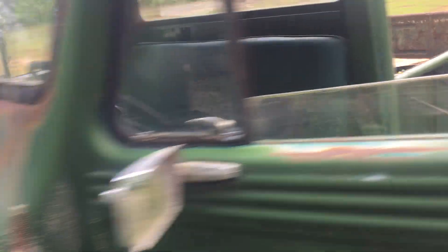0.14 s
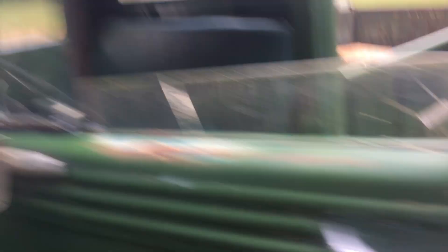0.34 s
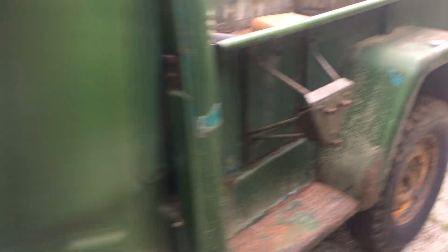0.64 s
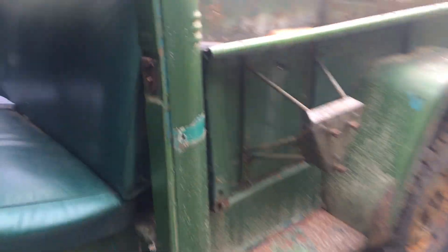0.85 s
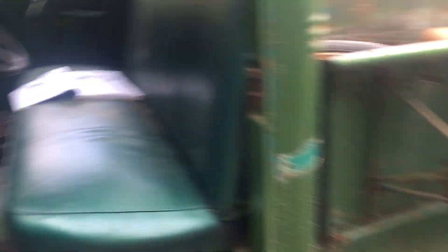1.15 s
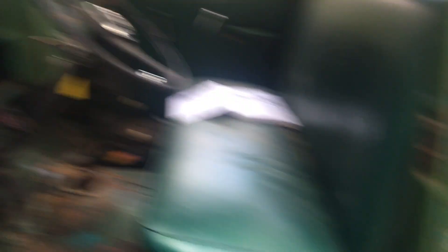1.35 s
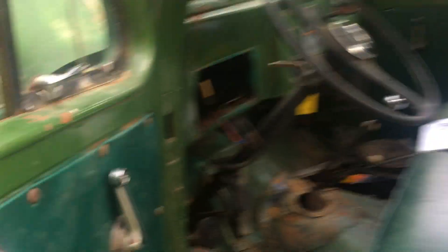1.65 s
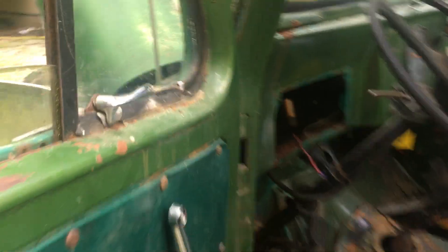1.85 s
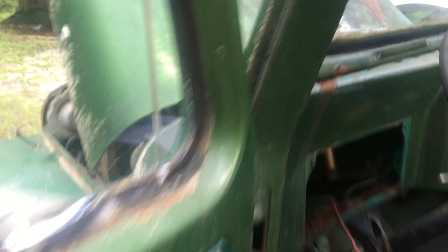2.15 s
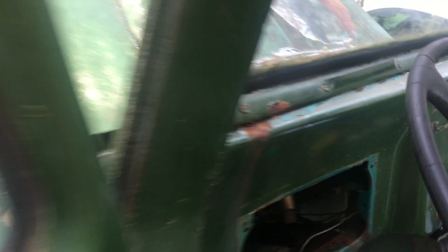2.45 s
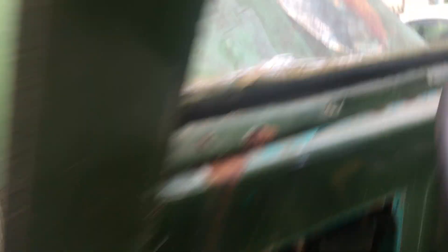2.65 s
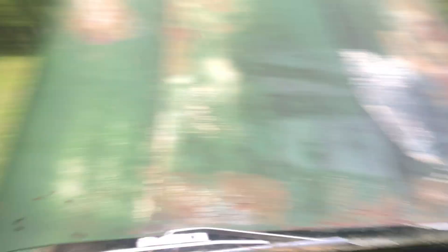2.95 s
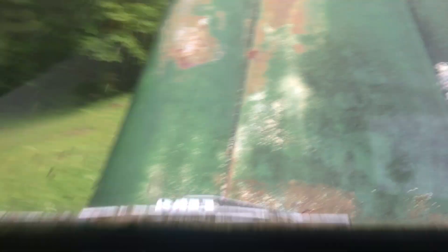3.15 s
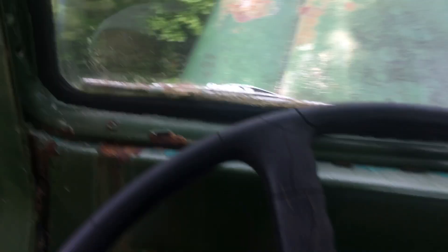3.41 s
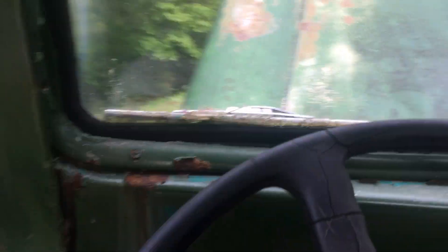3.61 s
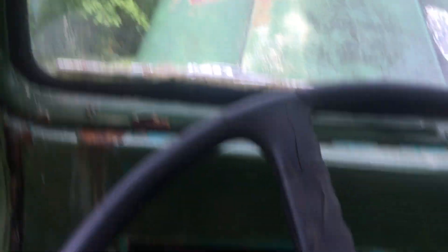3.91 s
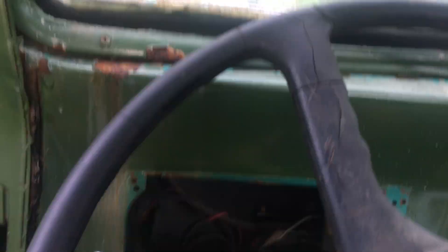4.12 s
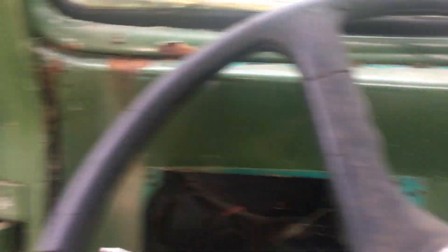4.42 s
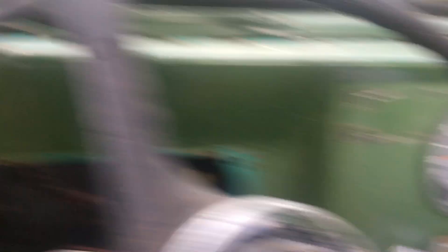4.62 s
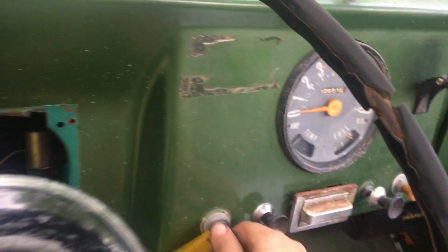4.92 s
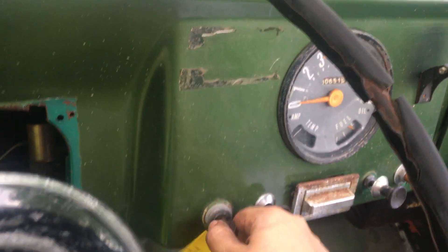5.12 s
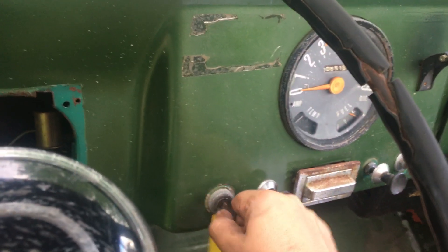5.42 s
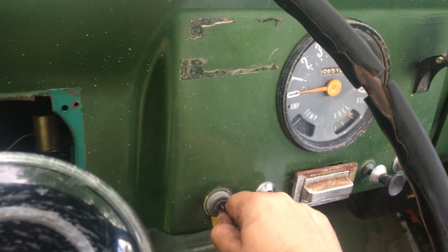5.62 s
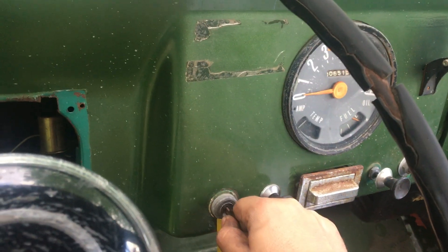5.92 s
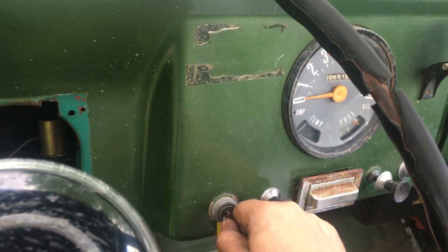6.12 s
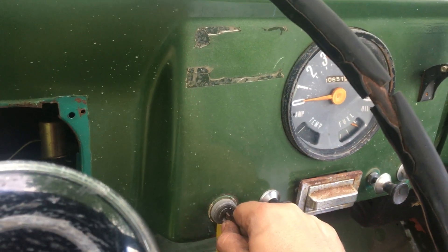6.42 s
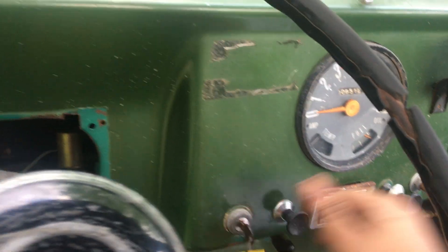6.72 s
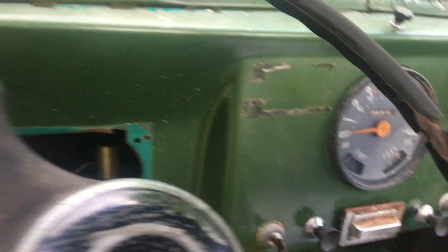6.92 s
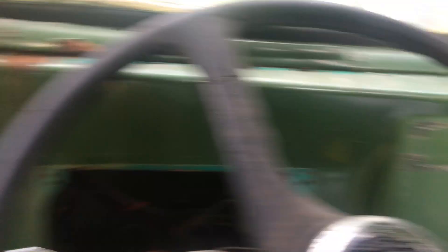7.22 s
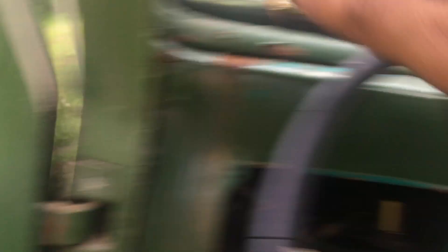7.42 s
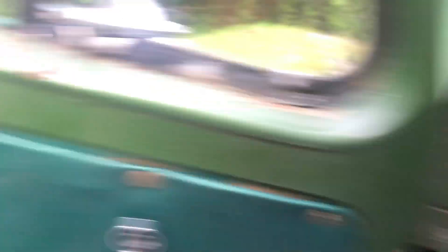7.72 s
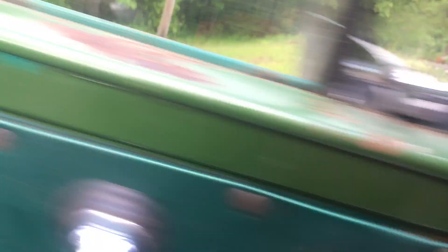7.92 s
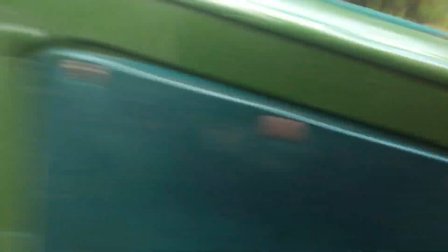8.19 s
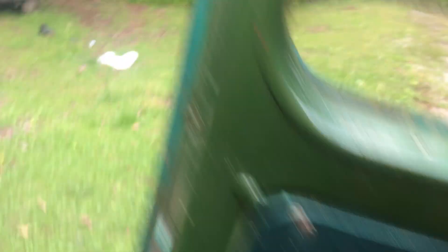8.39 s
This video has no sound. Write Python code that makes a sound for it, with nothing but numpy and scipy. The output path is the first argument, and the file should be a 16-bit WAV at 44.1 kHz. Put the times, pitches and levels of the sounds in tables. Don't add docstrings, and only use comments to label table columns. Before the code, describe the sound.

A rough old petrol engine idles with a deep uneven boom, knocks and hisses, then is switched off and shudders down into rustles and thuds.

```python
import sys
import numpy as np
from scipy import signal
from scipy.io import wavfile
from scipy.ndimage import uniform_filter1d

SR = 44100
rng = np.random.default_rng(int(sys.argv[2]) if len(sys.argv) > 2 else 0)


def file_out(sig):
    cols = np.atleast_2d(sig).T
    lim = np.clip(cols, -1, 1)
    pcm = np.round(lim * 32767).astype(np.int16)
    wavfile.write(sys.argv[1], SR, pcm)


def natural_amplitude(level_db):
    exponent = np.asarray(level_db, float) / 20
    return 10 ** exponent


N = 377055
TIME = np.arange(N) / SR
STEP = np.arange(0, N / SR + .002, .002)
FRAME_START = np.arange(N // 256 + 5) * 256

# time in seconds, firings per second.
IDLE = [(0.0, 68.5), (0.75, 68.2), (1.25, 66.9), (1.5, 67.0), (2.0, 68.3), (2.35, 67.3), (2.8, 67.3),
        (3.25, 68.4), (4.0, 68.1), (4.5, 67.15), (5.5, 66.4)]
KEY_OFF_S, COAST_S, FRICTION_FIRINGS_PER_S = 5.635, 1.1, 12.5
START_TURN_FIRINGS = -.7
SPARK_FADE_S, CRAWL_FIRINGS_PER_S = 0.13, 12.1
# exhaust pulse in dB, lateness in firings, knock in dB, hiss in dB.
CYLINDERS = [(1.5, -.05, -8, -.8), (1, -.05, -9, 1.7), (-2.5, .14, -5, -.8), (-3, .1, 0, .7),
             (2.8, -.08, -1, .6), (-1.5, -.03, -9, -.9)]
MISFIRE_S = [1.279, 1.759, 2.469, 3.089, 3.589, 4.514]
# frequency in Hz, width in Hz, level in dB.
BOOM_MODES = [(64, 44, 0), (113, 18, -15)]
# frequency in Hz, density in dB per Hz.
RUMBLE_COLOUR = [(20, -30), (40, -6), (55, 18), (75, 21), (90, -0.5), (110, -6), (130, -11.5), (200, -15),
                 (400, -55)]
# frequency in Hz, width in Hz, dB at the door, dB in the cab,
# dB gained without spark.
BLOCK_MODES = [(119.3, 21, 3, -0.5, -10), (152, 29, -6, -24, 3), (168, 14.7, -5.5, -7, 3),
               (179, 33, -11, -17.5, 4.5), (212.6, 31, -2.5, -6, -0.5), (227.8, 8.5, -2.5, -4.5, 3),
               (263.7, 25.6, -4.5, -6.5, -4.5), (357, 24, -13, -21.5, 0), (586, 56, -14, -12.5, -2)]
# frequency in Hz, density in dB per Hz.
ROAR_COLOURS = [
    [(180, -25), (300, 5.5), (359, -6), (396, -6), (450, 1.5), (492, -1.5), (571, -6.5), (669, -2.5), (761, -10.5), (965, -3.5), (1510, -7.5), (1870, -4), (2450, -8), (2790, -13), (3200, -50), (4160, -63), (7040, -120)],
    [(180, -61), (300, -10.5), (338, 2), (464, -4.5), (522, -6.5), (571, -3.5), (612, -1.5), (710, -2.5), (792, -7.5), (1130, -4), (1550, -5.5), (1710, -2.5), (2450, -14.5), (2650, -24), (3200, -20.5), (4160, -45), (7040, -120)],
]
# frequency in Hz, density in dB per Hz.
HISS_COLOURS = [
    [(1530, 3.5), (2600, -24), (2950, -2.5), (4420, -10.5), (4840, -12), (6110, -12.5), (7640, -22.5), (9710, -21.5), (10300, -24), (12500, -20.5), (15600, -27)],
    [(1530, -1.5), (2600, -3), (2930, -7), (3230, -1), (4420, -3), (4840, -7), (5930, -6), (7530, -12), (9570, -12), (10400, -17), (12400, -13), (15600, -21)],
]
# frequency in Hz, tint in dB.
COAST_TINT = [(0, -6), (500, 1), (700, 2.5), (850, 0.5), (1150, -1.5), (1750, 1.5), (2200, 0), (22050, -16)]
# turns a cycle, dB at the door, dB in the cab.
ORDER_TONES = [(3, -14, -22), (4, -18, -19), (5.03, -15, -15.5), (8, -14, -21), (9, -18, -19),
               (11, -16, -19.5), (12, -24, -28), (14, -15.5, -36), (15, -16.5, -42), (16, -27, -25.5),
               (17, -22, -40), (20, -14.5, -22.5), (18, -24, -28)]
GEAR_TEETH_PER_CYCLE, GEAR_DB = 50, -19
CAB_NOTE_HZ, CAB_NOTE_WIDTH_HZ, CAB_NOTE_DB = 120, 12, -11
# time in seconds, share inside 0-1.
INSIDE = [(0, 0.37), (1.3, 0.16), (2.1, 0.7), (2.9, 0.93), (8.55, 1)]
# time in seconds, shelter 0-1.
SHELTER = [(0, 0.06), (.49, 0.38), (.99, 0.53), (1.4, 0.46), (1.8, 0.61), (2.5, 0.84), (3.2, 0.76),
           (3.55, 1), (4.06, 0.91), (4.35, 0.97), (5.5, 1.05)]
# dB in the open, dB per shelter, dB inside the cab, dB change without
# spark, dB per dB of speed.
LAYERS = [(-15, 0.5, 0.5, -6, -0.5), (-24, -5.5, -0.25, -5, 0.84), (-26, -6.5, 1.07, -3.5, 0.89),
          (-37, -12, 6, -3, 1.26)]
# time in seconds,
# level in dB against warm idle.
BOOM_LEVEL = [(0, -7), (.5, -6.5), (1.4, -6), (2.5, -2.5), (3.1, -1), (3.6, -2.5), (4.1, -2.5), (4.4, -1),
              (5.52, -2.5), (5.72, 5), (5.92, -3.5), (6.13, -2), (6.36, -2.5), (6.56, -13), (6.77, -19.5),
              (6.88, -20), (7.25, -24), (7.45, -35)]
# time in seconds, boom gain in dB.
SURGES = [(.13, 2), (.545, 4), (.81, 3), (1.02, 4), (1.32, 4.5), (1.385, 5), (1.47, 5), (1.71, 2),
          (1.765, 4), (2.365, 5), (2.505, 1), (2.59, 3), (2.74, 3.5), (2.855, 1.5), (3.01, 2.5),
          (3.125, 1.5), (3.62, 3.5), (3.74, 3), (3.885, 3), (4.36, 3), (4.55, 4), (4.63, 2), (4.715, 2.5),
          (4.81, 3), (5.05, 3.5), (5.41, 4.5), (5.5, 3), (5.6, -5), (5.64, 2.5), (5.74, 4.5), (6.15, 5),
          (6.33, 2), (6.365, 3)]
SURGE_S = 0.012
# time in seconds, knock gain in dB, length in seconds.
SHUDDERS = [
    (1.81, 5, 0.017),
    (3.08, 3.5, 0.11),
    (4.384, .5, 0.2),
    (5.06, -1, 0.05),
    (5.682, 8, 0.074),
    (6.099, 6.5, 0.081),
    (6.41, 8.5, 0.043),
    (6.845, 10, 0.34),
    (7.6, 10.5, 0.08),
]
# time in seconds, frequency in Hz, share cancelled 0-1.
SHADOW = [(1.1, 450, 0), (1.5, 450, .35), (2.0, 380, 0.4), (2.4, 524, 0.54), (2.8, 605, 0.2),
          (3.2, 690, .3), (3.5, 650, 0), (4.9, 560, 0), (5.3, 544, 0.43), (5.7, 520, 0)]
SHADOW_WIDTH_HZ = 190

# frequency in Hz, width in Hz, level in dB.
WHINE = [(8130, 400, -69.5), (11550, 350, -70)]
# frequency in Hz, density in dB per Hz.
YARD_COLOUR = [(18, -43), (30, -9), (152, -10.5), (192, -2), (292, -12), (351, -14), (444, -16),
               (533, -14.5), (789, -23), (1640, -21), (2900, -30.5), (6000, -33.5), (15600, -43)]
YARD_DB = -38.5
# time in seconds, peak in dB, bright share in dB, ring in Hz.
SNAPS = [(.2503, -34, 0, 1800), (2.0532, -37, 0, 1800), (2.3151, -38, 0, 1800), (3.399, -18, -20, 2040),
         (6.5422, -44, -2, 1900), (6.926, -33, -25, 600), (7.2367, -36, -8, 2200), (7.3349, -27, -9, 1850),
         (7.3913, -28, -12, 2000), (7.51, -34, -12, 2000), (7.5434, -31, -14, 1500),
         (7.5694, -34, -16, 1100), (7.6477, -38, -3, 1610), (7.7869, -46, 2, 1700), (7.8358, -37, -7, 1720),
         (8.0019, -42, 3, 1700), (8.0657, -39, -9, 2240), (8.114, -46, 4, 4500), (8.1715, -46, 8, 6000),
         (8.1765, -44, 10, 6000), (8.184, -45, 0, 7500), (8.192, -46, 0, 6000), (8.2504, -45, 0, 7000),
         (8.3062, -48, 9, 1800), (8.3631, -44, -10, 1810), (8.415, -54, 5, 1800)]
# time in seconds, peak in dB, ring in Hz, relative boom in dB.
POPS = [(1.324, -14, 150.6, -4), (1.77, -16, 145.6, -6), (2.481, -20, 153, -7), (.62, -22.5, 355, -20),
        (.9, -26, 365, -20), (3.108, -20, 170, 6), (3.319, -15, 123.6, 1), (3.594, -27, 146, 12),
        (4.53, -14, 142.4, -14), (6.336, -20.5, 218, -12), (6.352, -20, 156, -13), (6.378, -20, 239, -6),
        (6.408, -19.5, 214, -10), (6.444, -27, 239, -10), (6.516, -38, 220, -10), (6.622, -25.5, 115, 13),
        (6.683, -26, 126, 11), (6.758, -28, 112, 13.5), (6.811, -33, 218, -14), (6.845, -34, 110, -1)]
# time in seconds, peak in dB, ring in Hz, relative spray above 1.7 kHz in dB.
SPITS = [(0.6334, -28, 1340, -20), (1.0736, -28, 1880, -22), (1.329, -30, 2300, -9.5),
         (1.769, -29, 1890, -15), (2.4684, -27.5, 1840, -9.5), (3.096, -26.5, 2320, -12),
         (3.102, -26.5, 1420, -30), (3.14, -25, 1940, -23), (3.19, -26, 1900, -18),
         (3.396, -20.5, 1970, -15.5), (3.404, -28, 1850, -4), (3.442, -30, 1850, -25),
         (3.539, -33.5, 1900, -1), (4.513, -35, 1910, 1.5), (5.3508, -31, 1510, -8),
         (5.556, -22.5, 1250, -26), (5.565, -27, 2030, -25), (5.58, -30, 600, -30), (6.58, -42, 1960, -9),
         (6.6165, -36, 1700, -6), (6.659, -33, 1910, -14), (6.802, -36, 1580, -22), (6.864, -48, 2000, -25),
         (6.882, -54, 1700, -5), (6.922, -35, 596, -33), (7.19, -36, 2700, -6), (7.233, -36, 2150, -11),
         (7.275, -35.5, 1700, -6), (7.29, -34, 1640, -18), (7.322, -31, 1830, -10), (7.333, -37, 1910, -7),
         (7.35, -32, 1890, -15), (7.389, -31.5, 1960, -15), (7.395, -30, 1560, -22), (7.4, -40, 3300, -20),
         (7.41, -35, 1920, -18), (7.509, -42, 1450, -8), (7.543, -41, 1290, -14), (7.569, -39, 1150, -13),
         (7.648, -39.5, 1590, -1.5), (7.68, -40, 1800, -20), (7.762, -41.5, 1780, -5),
         (7.835, -41.5, 1710, -2), (7.875, -47, 1900, -1), (7.905, -42, 2000, -8), (7.993, -42, 1670, -16),
         (8.008, -41, 2000, -9), (8.066, -41, 2080, -14), (8.172, -45, 1710, -3), (8.303, -54, 1700, 3),
         (8.379, -47, 1680, -13)]
SPRAY_RISE_S, SPRAY_FADE_S, RATTLE_RISE_S = .003, .011, .0012

# start in seconds, length in seconds, first dB, last dB, bright share in dB.
RUBS = [
    (6.507, 0.17, -49, -37.5, -8),
    (7.178, 0.13, -39.5, -36.5, -10),
    (7.307, 0.05, -30, -34, -9.5),
    (7.363, 0.04, -34, -34.5, -16),
    (7.436, 0.485, -47, -44, -8.5),
    (7.923, 0.095, -60, -43.5, -7),
    (8.023, 0.056, -51, -47, -5),
    (8.077, 0.23, -48, -45, -7.5),
    (8.343, 0.063, -50, -55, 0),
]
# frequency in Hz, width in Hz, level in dB.
RUB_MODES = [(1340, 320, 10), (1880, 510, 8), (2700, 600, -35)]
# frequency in Hz, density in dB per Hz.
RUB_COLOUR = [(1760, -4), (3000, -3.5), (4060, -1.5), (4630, -3), (6630, -3.5), (7980, -10.5), (9700, -8),
              (10400, -15.5), (11200, -9), (15600, -18)]
RUB_RISE_S, RUB_FALL_DB_PER_S, BRIGHT_FOLLOW = 0.033, 402, 0.47
FOLD_HZ, FOLD_OPEN_S, FOLD_SHUT_S = 1700, 7.2, 7.44
FOLD_TIGHT_SHARE, FOLD_SAG_S, FOLD_WANDER_SHARE = 0.29, 0.042, 0.087
# start in seconds, length in seconds, level in dB, ring in Hz.
FLEX = [
    (7.36, 0.074, -48, 175),
    (7.563, 0.14, -35, 174),
    (7.726, 0.16, -31, 175),
    (7.944, 0.043, -40, 176),
    (8.124, 0.056, -30.5, 235),
    (8.198, 0.07, -39, 318),
]
FLEX_RISE_S, FLEX_FALL_DB_PER_S = 0.033, 222
FLEX_REST_DB, FLEX_FADE_DB_PER_S = -48.5, 37
# time in seconds, peak in dB, ring in Hz.
THUDS = [(7.585, -21, 68), (7.606, -21, 155), (7.61, -23, 453), (7.656, -29, 200), (7.776, -13, 163),
         (7.807, -24, 173), (7.838, -22, 127), (7.836, -27, 586), (7.996, -17, 155), (9.1, -17.5, 190),
         (8.155, -15, 366), (8.175, -13.5, 183), (8.24, -29, 340), (8.27, -37, 70), (8.315, -34, 298),
         (8.42, -34, 253), (8.28, -22, 350), (8.225, -31, 330), (8.255, -29, 360), (8.008, -26, 150),
         (7.7, -28, 75), (7.68, -30, 600), (7.73, -31, 520)]


def evened(x):
    return x / np.sqrt(np.mean(x ** 2) + 1e-20)


def levelled(x):
    power = uniform_filter1d(uniform_filter1d(x ** 2, size=6000), size=6000)
    return x / np.sqrt(abs(power) + 1e-12)


def columns(rows):
    s, *values = np.transpose(rows)
    return [np.interp(TIME, s, v) for v in values]


def smooth(v):
    return np.interp(TIME, STEP, v)


def stroke(start_s, length_s, rise_s, fall_db_per_s):
    attack = np.clip((STEP - start_s) / rise_s, 0, 1)
    return attack * natural_amplitude(-fall_db_per_s * np.clip(STEP - start_s - length_s, 0, 1))


def bumps(rows):
    return smooth(sum(db * np.exp(-.5 * ((STEP - s) / length_s) ** 2) for s, db, length_s in rows))


def add(mix, s, sound):
    part = mix[round(s * SR):][:len(sound)]
    part += sound[:len(part)]


def resonate(x, hz, width_hz):
    r = np.exp(-np.pi * width_hz / SR)
    if np.ndim(hz) == 0:
        return 2 * signal.lfilter([1 - r], [1, -r * np.exp(2j * np.pi * hz / SR)], x).real
    turn = np.exp(2j * np.pi * np.cumsum(hz) / SR)
    return 2 * (turn * signal.lfilter([1 - r], [1, -r], x / turn)).real


def resonate_twice(x, hz, first_width_hz, second_width_hz):
    return resonate(resonate(x, hz, first_width_hz), hz, second_width_hz)


def highpass(x, order, hz):
    return signal.sosfilt(signal.butter(order, hz, "high", fs=SR, output="sos"), x)


def ring(hz, t60_s, rise_s):
    t = np.arange(6000) / SR
    tone = np.sin(2 * np.pi * hz * t) * natural_amplitude(-60 * t / t60_s) * (1 - np.exp(-t / rise_s))
    return tone / abs(tone).max()


def colour(points):
    hz, db = np.transpose(points)
    bins_hz = np.fft.rfftfreq(1024, 1 / SR)
    return np.interp(np.log(bins_hz + 1), np.log(hz + 1), db, left=-90, right=-90)[:, None]


def blended(pair):
    inside = np.clip(np.interp(FRAME_START / SR, *np.transpose(INSIDE)), 0, 1)
    door, cab = colour(pair[0]), colour(pair[1])
    return door + inside * (cab - door)


def noise(colour_db, patchy_db, size=N):
    a, b, patches = rng.standard_normal((size // 256 + 5, 513, 3), dtype=np.float32).T
    patches = evened(uniform_filter1d(uniform_filter1d(patches, size=8, axis=0), size=8, axis=1))
    z = (a + 1j * b) * natural_amplitude(colour_db + patchy_db * patches).astype(np.float32)
    return evened(signal.istft(z, nperseg=1024, noverlap=768)[1][:size].astype(float))


def firing_rate():
    coast = np.exp(-np.clip(TIME - KEY_OFF_S, 0, None) / COAST_S)
    return np.maximum((columns(IDLE)[0] + FRICTION_FIRINGS_PER_S) * coast - FRICTION_FIRINGS_PER_S, 2)


def firings(turns):
    count = np.arange(int(turns[-1]) + 2)
    cylinder = count % 6
    chance = rng.standard_normal((len(count), 3))
    burning = np.interp(count, turns, np.clip((5.62 - TIME) / .1, .3, 1))
    late = np.transpose(CYLINDERS)[1]
    place = count + burning * late[cylinder] + .02 * chance[:, 0]
    return cylinder, place, burning, chance


def exhaust_boom(speed, turns, cylinder, place, burning, chance):
    pulse_db = np.transpose(CYLINDERS)[0]
    strength = natural_amplitude(burning * (pulse_db[cylinder] + 1.2 * chance[:, 1]))
    missed = np.interp(MISFIRE_S, TIME, turns).round().astype(int)
    strength[missed] *= .3
    strength[missed + 1] *= 1.3
    near = np.clip(turns.round().astype(int), 0, None)
    puff_width = .045 + speed / 1000
    puffs = strength[near] * np.exp(-.5 * ((turns - place[near]) / puff_width) ** 2)
    pipe = sum(natural_amplitude(db) * resonate_twice(puffs, hz, width, width) for hz, width, db in BOOM_MODES)
    pumping = np.clip((speed - 16) / 14, 0, 1)
    shaking = natural_amplitude(-15) * noise(colour(RUMBLE_COLOUR), patchy_db=1.5)
    return levelled(highpass(pumping * levelled(highpass(pipe, 4, 39)) + shaking, 4, 39))


def order_tones(turns, inside):
    waver = rng.standard_normal((len(ORDER_TONES), 2, 70))
    grid_s = np.linspace(0, N / SR, waver.shape[2])
    out = np.zeros(N)
    for (order, door_db, cab_db), (loud, slip) in zip(ORDER_TONES, waver):
        level_db = door_db + inside * (cab_db - door_db) + 1.8 * np.interp(TIME, grid_s, loud) + 3
        phase = 2 * np.pi * order / 6 * turns + .45 * np.interp(TIME, grid_s, slip)
        out += natural_amplitude(level_db) * np.sin(phase)
    return out * np.clip((KEY_OFF_S - TIME) / .08, 0, 1)


def cab_note(speed, turns, unlit):
    swell = np.exp(-.5 * ((3 * speed - CAB_NOTE_HZ) / CAB_NOTE_WIDTH_HZ) ** 2)
    return unlit * natural_amplitude(CAB_NOTE_DB + 2) * np.sin(2 * np.pi * 3 * turns) * swell


def block_knock(turns, inside, cylinder, place, burning, chance):
    knock_db = np.transpose(CYLINDERS)[2]
    at = (np.interp(place + .03 * chance[:, 1], turns, TIME) * SR).astype(int)
    knocks = np.zeros(N)
    knocks[at] = burning ** 2 * natural_amplitude(knock_db[cylinder] + 2.6 * chance[:, 2])
    blows = evened(signal.oaconvolve(knocks, np.hanning(60), "same"))
    drive = blows + natural_amplitude(-10) * rng.standard_normal(N)
    lags = rng.integers(0, 2500, len(BLOCK_MODES))
    sways_db = 1.2 * rng.standard_normal((len(BLOCK_MODES), 24))
    sway_s = np.linspace(0, N / SR, 24)
    off = np.clip((TIME - KEY_OFF_S + .06) / .08, 0, 1)
    block = np.zeros(N)
    for (hz, width, door_db, cab_db, off_db), lag, sway_db in zip(BLOCK_MODES, lags, sways_db):
        level_db = door_db + inside * (cab_db - door_db) + off * off_db + np.interp(TIME, sway_s, sway_db)
        block += natural_amplitude(level_db) * np.roll(resonate(drive, hz, width), lag)
    walls = signal.butter(3, [105, 750], "band", fs=SR, output="sos")
    return levelled(signal.sosfilt(walls, block))


def gear_whine(speed, turns):
    tone = np.sin(2 * np.pi * GEAR_TEETH_PER_CYCLE / 6 * turns)
    return natural_amplitude(GEAR_DB) * np.sqrt(2) * tone * np.clip(speed / 20 - 2.3, 0, 1)


def roar_and_hiss(turns, unlit):
    hiss_db = np.transpose(CYLINDERS)[3]
    throb_db = np.interp(turns + .05, np.arange(6), hiss_db, period=6)
    flicker_db = evened(uniform_filter1d(rng.standard_normal(N), size=500))
    tint_db = colour(COAST_TINT) * unlit[np.minimum(FRAME_START, N - 1)]
    roar = levelled(noise(blended(ROAR_COLOURS) + tint_db, patchy_db=2))
    hiss = levelled(noise(blended(HISS_COLOURS), patchy_db=1.3))
    return roar * natural_amplitude(.2 * throb_db + .6 * flicker_db), hiss * natural_amplitude(1.1 * throb_db + .6 * flicker_db)


def door_shadow(x):
    hz, share = columns(SHADOW)
    return x - np.clip(share, 0, 1) * resonate(x, hz, SHADOW_WIDTH_HZ)


def heard_db(speed, unlit):
    ratio = np.maximum(speed, CRAWL_FIRINGS_PER_S) / IDLE[-1][1]
    slowed_db = (TIME > KEY_OFF_S) * 20 * np.log10(ratio)
    drivers = [np.ones(N), columns(SHELTER)[0], columns(INSIDE)[0], unlit, slowed_db]
    boom, knock, roar, hiss = np.array(LAYERS) @ drivers
    surging = bumps([(s, db, SURGE_S) for s, db in SURGES])
    return boom + columns(BOOM_LEVEL)[0] + surging, knock + bumps(SHUDDERS), roar, hiss


def engine():
    speed = firing_rate()
    turns = START_TURN_FIRINGS + np.cumsum(speed) / SR
    fired = firings(turns)
    inside = np.clip(columns(INSIDE)[0], 0, 1)
    unlit = np.clip((TIME - KEY_OFF_S) / SPARK_FADE_S, 0, 1)
    boom = exhaust_boom(speed, turns, *fired)
    boom = boom + order_tones(turns, inside) + cab_note(speed, turns, unlit)
    knock = block_knock(turns, inside, *fired) + gear_whine(speed, turns)
    roar, hiss = roar_and_hiss(turns, unlit)
    layers = (boom, door_shadow(knock), door_shadow(roar), hiss)
    mix = sum(natural_amplitude(db) * layer for db, layer in zip(heard_db(speed, unlit), layers))
    return mix * np.clip((7.7 - TIME) / 0.03, 0, 1)


def insects():
    air = rng.standard_normal(N)
    song = sum(natural_amplitude(db) * evened(resonate_twice(air, hz, width, width)) for hz, width, db in WHINE)
    return song * smooth(stroke(0, 6.5, .1, 40))


def yard():
    return natural_amplitude(YARD_DB - 6.5) * smooth(stroke(-0.98, 9.16, .1, 24)) * noise(colour(YARD_COLOUR), patchy_db=1.2)


def snaps():
    out, t = np.zeros(N), np.arange(400) / SR
    grit = signal.lfilter([1, 0, -1], [1], rng.standard_normal((len(SNAPS), 400)))
    grit = grit * natural_amplitude(-60 * t / .012) / 3
    for (s, db, bright_db, hz), tick in zip(SNAPS, grit):
        add(out, s, natural_amplitude(db) * ring(hz, 0.01, .0004))
        add(out, s, natural_amplitude(db + bright_db) * tick)
    return out


def pops():
    out = np.zeros(N)
    for s, db, hz, boom_db in POPS:
        thump = ring(hz, 0.18, 0.01) + natural_amplitude(boom_db) * ring(56, 0.22, 0.0088)
        add(out, s, natural_amplitude(db - 4.0) * thump)
    return out


def spits():
    out, t = np.zeros(N), np.arange(6000) / SR
    spray = noise(colour(RUB_COLOUR), patchy_db=3.0, size=6000 * len(SPITS))
    swell = 2 * (1 - np.exp(-t / SPRAY_RISE_S)) * np.exp(-t / SPRAY_FADE_S)
    for k, (s, db, hz, spray_db) in enumerate(SPITS):
        rattle = evened(resonate_twice(rng.standard_normal(6000), hz, 300, 650)) * natural_amplitude(-60 * t / .075)
        puff = spray[6000 * k:][:6000] * swell
        add(out, s, natural_amplitude(db - 0.5) * rattle * (1 - np.exp(-t / RATTLE_RISE_S)))
        add(out, s - SPRAY_RISE_S / 2, natural_amplitude(db + spray_db - 1.5) * puff)
    return out


def fold_pitch():
    sag = FOLD_TIGHT_SHARE * (STEP > FOLD_OPEN_S - .02) * np.exp(-abs(STEP - FOLD_OPEN_S) / FOLD_SAG_S)
    wander = FOLD_WANDER_SHARE * evened(uniform_filter1d(rng.standard_normal(len(STEP)), size=12))
    return smooth(FOLD_HZ * (1 + sag + wander))


def rubs():
    clumps = natural_amplitude(2 * evened(uniform_filter1d(rng.standard_normal(N), size=400)))
    sizes = natural_amplitude(2.4 * np.minimum(rng.exponential(1, N), 3.5))
    slipping = rng.random(N) < 3600 / SR
    slips = sizes * slipping * rng.standard_normal(N) * clumps
    rung = sum(natural_amplitude(db) * resonate(slips, hz, width) for hz, width, db in RUB_MODES)
    cab = levelled(resonate(rung, 1550, 2200))
    fold = levelled(resonate_twice(slips, fold_pitch(), 250, 450))
    crackle = noise(colour(RUB_COLOUR), patchy_db=2) * clumps ** .5 + .3 * np.diff(slips, prepend=0)
    low = bright = 0
    for start, length, first_db, last_db, bright_db in RUBS:
        to_go_db = np.interp(STEP, [start, start + length], [first_db - last_db, 0])
        press = stroke(start, length, RUB_RISE_S, RUB_FALL_DB_PER_S) * natural_amplitude(last_db)
        low = low + press * natural_amplitude(to_go_db)
        bright = bright + press * natural_amplitude(bright_db + BRIGHT_FOLLOW * to_go_db)
    ringing = 0.35 * (TIME < FOLD_SHUT_S) * fold + 0.41 * cab
    return smooth(low) * ringing + smooth(bright) * levelled(crackle)


def seat_flex():
    hz = columns([(s + length / 2, f) for s, length, _, f in FLEX])[0]
    shake = highpass(rng.standard_normal(N), 2, 110)
    broad = resonate(resonate(shake, 205, 360), 280, 710)
    flex = levelled(resonate_twice(shake, hz, 77, 135) + 0.23 * broad)
    load = natural_amplitude(FLEX_REST_DB) * stroke(FLEX[0][0], 0.92, FLEX_RISE_S, FLEX_FADE_DB_PER_S)
    for s, length, db, _ in FLEX:
        load += natural_amplitude(db) * stroke(s, length, FLEX_RISE_S, FLEX_FALL_DB_PER_S)
    return natural_amplitude(-4.5) * smooth(load) * flex


def thuds():
    out = np.zeros(N)
    for s, peak_db, hz in THUDS:
        add(out, s, natural_amplitude(peak_db - 6.5) * ring(hz, 0.026 + 6 / hz, 0.006))
    return out


def scene():
    running = engine() + insects() + yard() + snaps() + pops() + spits()
    handling = rubs() + seat_flex() + thuds()
    return (running + handling)[None]


def low_pass(x):
    return signal.sosfilt(signal.butter(12, 15720, fs=SR, output="sos"), x)


def record(dry):
    return low_pass(dry)


dry = scene()
out = record(dry)
file_out(out)
```